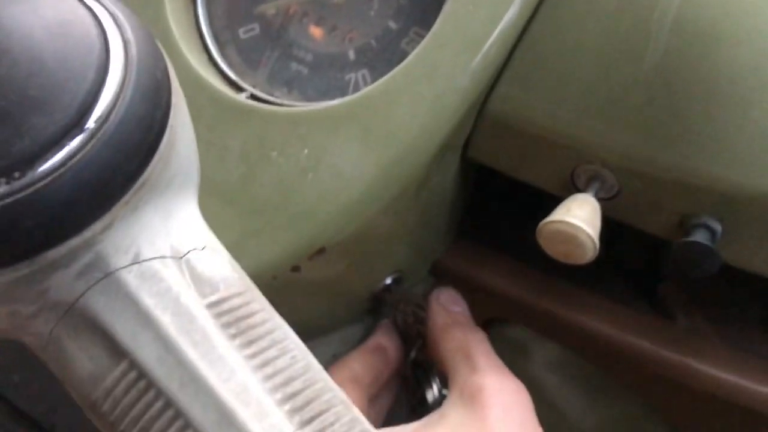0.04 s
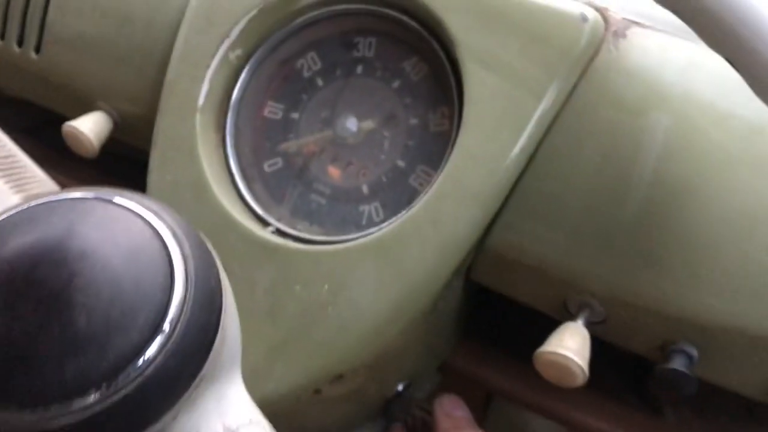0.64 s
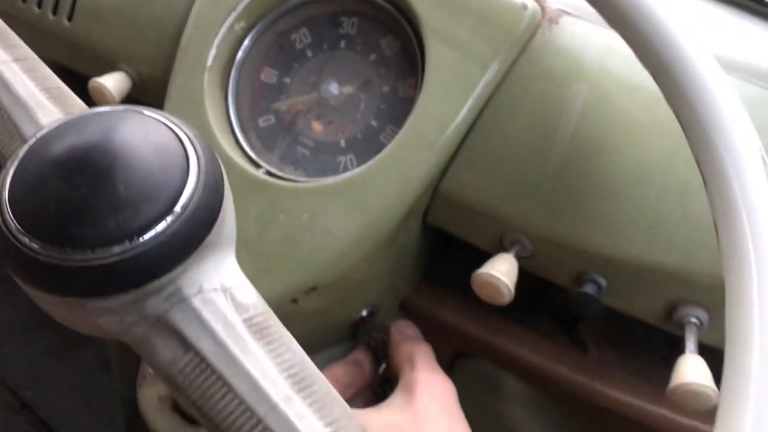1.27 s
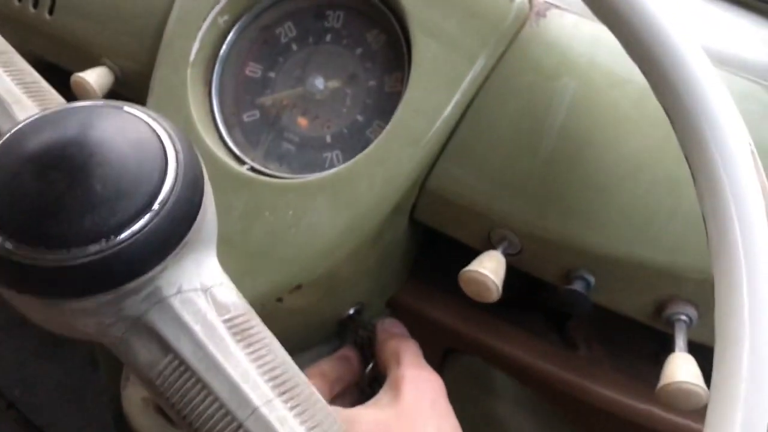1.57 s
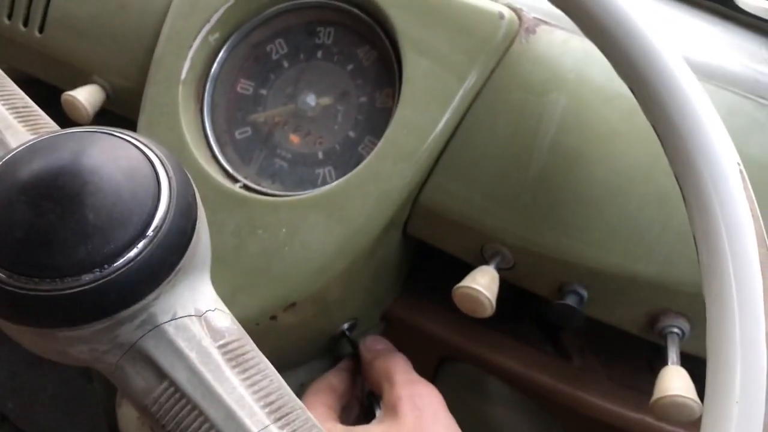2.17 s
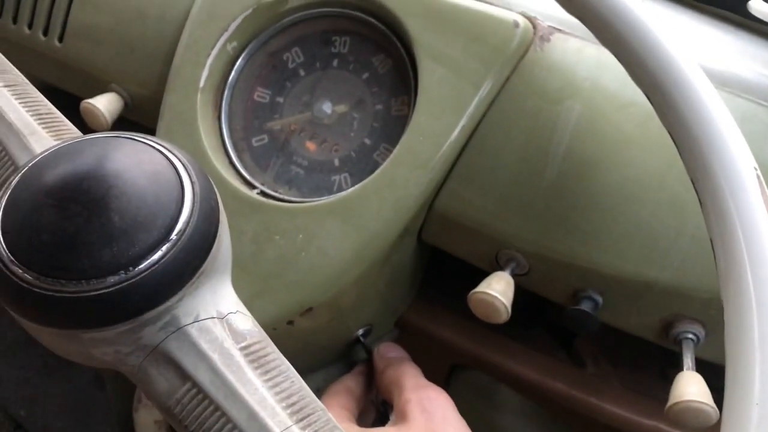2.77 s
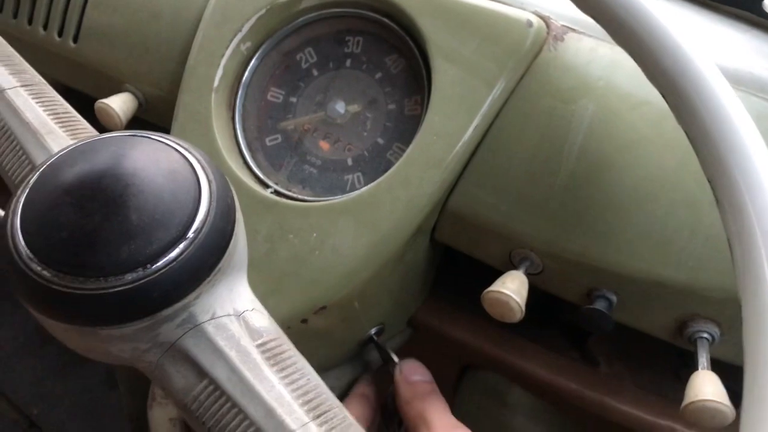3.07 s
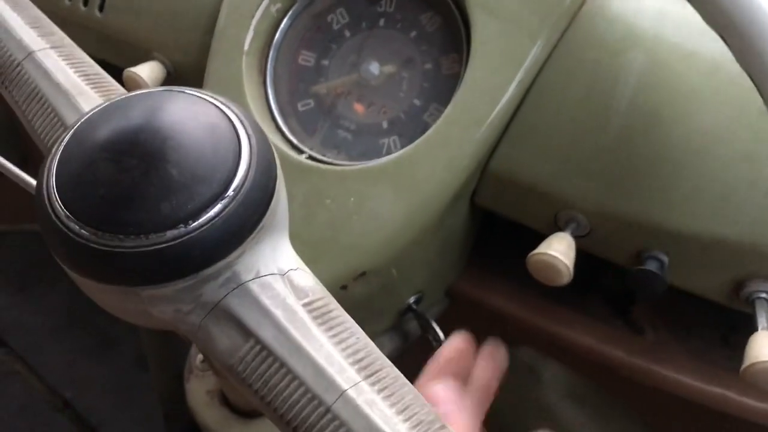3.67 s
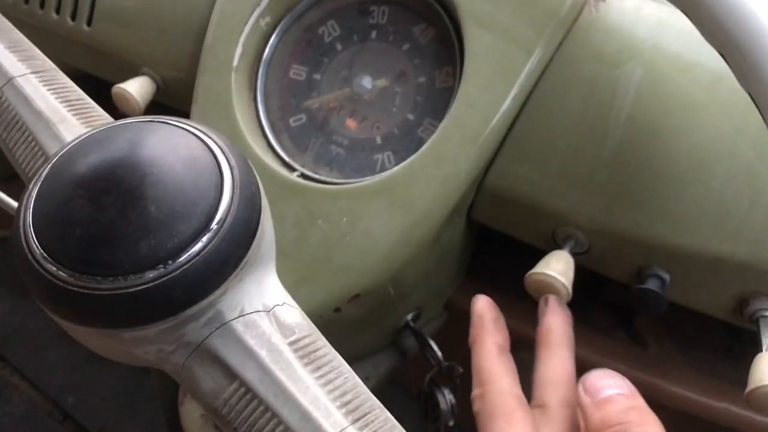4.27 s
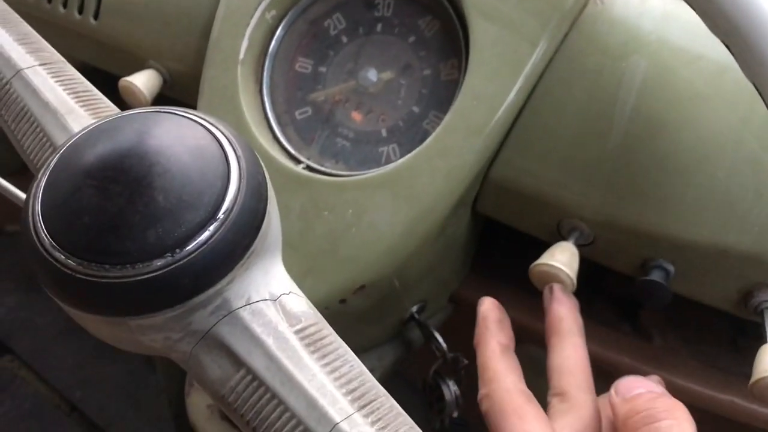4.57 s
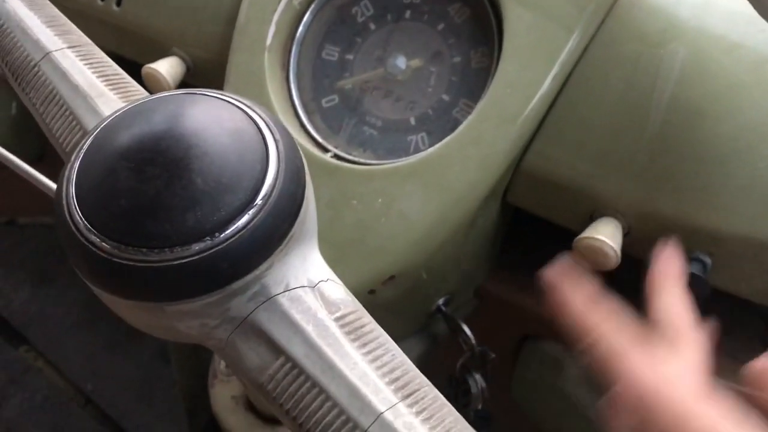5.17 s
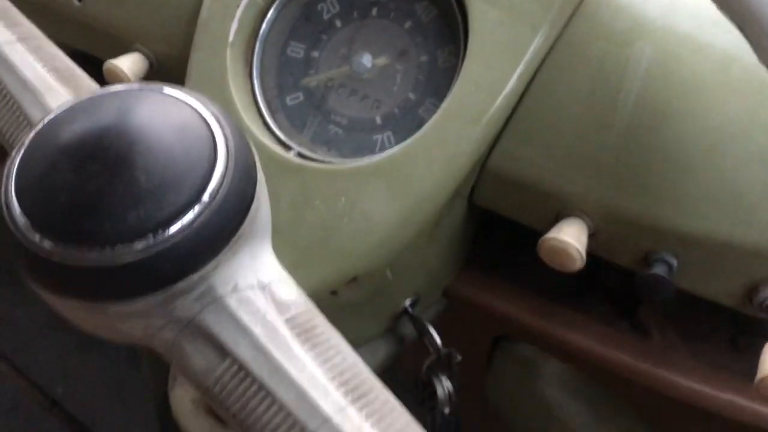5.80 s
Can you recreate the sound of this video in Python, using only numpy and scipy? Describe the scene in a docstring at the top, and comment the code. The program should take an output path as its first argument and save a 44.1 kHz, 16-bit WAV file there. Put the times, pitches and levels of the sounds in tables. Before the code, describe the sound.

Heard inside a metal cab, an air-cooled engine throbs, is switched off and runs down, followed by two sharp, ringing knob clicks.

```python
"""An old air-cooled flat-four idles behind the bare metal cab of a van, heard from the driver's seat.
Its exhaust pulses drive the air modes of the cab while panels drum, valves tap and the fan rushes.
The key clicks off, the key ring jingles, and the engine coasts and shudders to a stop against friction.
Over a faint outdoor rumble, a hand brushes and bumps the dashboard, a knob is pushed home through
two loud detents that set the sheet metal ringing, and something creaks by stick-slip friction."""
import sys
import numpy as np
from scipy import signal
from scipy.fft import rfft, irfft
from scipy.io import wavfile
from scipy.ndimage import uniform_filter1d

SR = 44100
rng = np.random.default_rng(int(sys.argv[2]) if len(sys.argv) > 2 else 0)


def pcm_store(signal):
    """Save signal as 16-bit PCM."""
    levels = np.round(np.clip(np.atleast_2d(signal), -1, 1) * 32767)
    wavfile.write(sys.argv[1], SR, levels.astype(np.int16).T)


N = 261954
T = np.arange(N) / SR
RING_T = T[:SR]  # time since a blow [s]
FIRST_FIRING_S, LAST_FIRING_S = .0595, 1.75
COAST_S, STOP_S = 1.695, 2.825
FIRING = T < LAST_FIRING_S


def amp(db):
    """Amplitude ratio of a level in decibels."""
    return 10 ** (np.asarray(db) / 20)


def unit_rms(x, span=slice(None)):
    """Normalisation to rms 1 over a span."""
    return x / np.sqrt(np.mean(x[span] ** 2) + 1e-20)


def bell(x, centre, width):
    """Gaussian of height 1, falling to 1/e at centre +- width."""
    return np.exp(-((x - centre) / width) ** 2)


def gain_at(points, hz):
    """Amplitude response of a spectrum in decibels."""
    return amp(log_interp(points, hz))


def log_interp(points, hz):
    """Interpolation on a log-frequency axis."""
    frequencies, values = np.transpose(points)
    return np.interp(np.log(hz + 1), np.log(frequencies), values)


def add(mix, start_s, sound):
    """Superposition of a sound on the mix."""
    part = mix[max(round(start_s * SR), 0):][:len(sound)]
    part += sound[:len(part)]


def coloured(x, spectrum, size=8192):
    """Minimum-phase filtering by a spectrum."""
    log_gain = np.log(gain_at(spectrum, abs(np.fft.fftfreq(size, 1 / SR))))
    response = np.exp(np.conj(signal.hilbert(log_gain)))
    taps = np.fft.ifft(response).real[:size // 2]
    return signal.oaconvolve(x, taps)[:len(x)]


def tilted(x, treble_db, bass_db):
    """Spectral tilt: a harder blow is brighter, a heavier one deeper."""
    return coloured(x, [(170, bass_db), (600, 0.016), (1900, 0.0017), (4000, treble_db)])


def resonate(x, hz, width_hz):
    """Second-order resonance with a peak gain of 1."""
    return signal.lfilter(*signal.iirpeak(hz, hz / width_hz, SR), x)


def forced_modes(drive, table):
    """Forced vibration: parallel resonances respond to one drive."""
    return sum(amp(db) * resonate(drive, hz, width) for hz, width, db in table)


def struck_modes(table, scatter_db, detune):
    """Free vibration: damped partials, weighted anew by where the blow lands; rms 1 at the start."""
    out = np.zeros(SR)
    for (hz, db, t60), (gain, shift, side) in zip(table, rng.standard_normal((len(table), 3))):
        envelope = amp(db + scatter_db * gain - 60 * RING_T / t60)
        out += np.sign(side) * envelope * np.sin(2 * np.pi * hz * (1 + detune * shift) * RING_T)
    return unit_rms(out, slice(SR // 50))


# damping of struck things in the cab: (frequency [Hz], t60 before scaling [s])
RING_TIMES = [(60, .9), (140, 0.69), (300, .35), (500, 0.13), (1000, .15), (1800, 0.12), (4000, 0.13),
              (8000, 0.11), (15000, 0.071)]
def ring(spectrum, t60_scale=1., rise_s=0.00017):
    """High modal density: ringing as noise, each band decaying at its own rate; rms 1 at the start."""
    hz, t, bands = signal.stft(rng.choice([-1., 1.], SR), SR, nperseg=256)
    t60 = t60_scale * log_interp(RING_TIMES, hz)[:, None]
    tail = signal.istft(bands * amp(-60 * t / t60), SR, nperseg=256)[1][:SR]
    attack = 1 - np.exp(-RING_T / rise_s)
    return unit_rms(coloured(tail * attack, spectrum), slice(SR // 50))


def speed_share(t=T):
    """Constant friction: without spark, the crank slows linearly from idle (1) to rest (0)."""
    return np.interp(t, [COAST_S, STOP_S], [1, 0])


# the idle lifts a little and settles: (time [s], speed [cycles/s])
IDLE_SPEED = [(.3, 8.08), (.75, 8.25), (1.05, 8.08)]
def speed(t=T):
    """Crank speed in four-stroke cycles per second."""
    return np.interp(t, *np.transpose(IDLE_SPEED)) * speed_share(t)


def crank_times(phase):
    """Phase is the integral of speed: the moments at which the crank passes a point in its cycle."""
    step = 32  # samples
    t = T[::step]
    cycles = np.cumsum(speed(t)) * step / SR
    cycles -= np.interp(FIRST_FIRING_S, t, cycles)
    marks = np.arange(-1, cycles[-1]) + phase
    return np.interp(marks[(marks > cycles[0]) & (marks < cycles[-1])], cycles, t)


def strokes(table, scatter_db):
    """Impulse train locked to the crank, with random scatter in level."""
    blows = np.zeros(N)
    for phase, db in table:
        times = crank_times(phase)
        blows[(times * SR).astype(int)] += amp(db + scatter_db * rng.standard_normal(len(times)))
    return blows


def puffed(blows, width_s):
    """Convolution turns each impulse into a smooth pressure swing, a Gaussian's second derivative."""
    u = np.linspace(-8, 8, 2 * round(8 * width_s * SR) + 1)
    return signal.oaconvolve(blows, (u ** 2 - 1) * np.exp(-u ** 2 / 2), "same")


def bursts(blows, decay_s):
    """Leaky integration: an envelope that jumps at each impulse and decays; rms 1 at idle."""
    return unit_rms(signal.lfilter([1], [1, -np.exp(-1 / (decay_s * SR))], blows), FIRING)


def running_gain(power, lag_s):
    """Power law: a gain that follows crank speed through a first-order lag."""
    pole = np.exp(-1 / (lag_s * SR))
    return 1 - signal.lfilter([1 - pole], [1, -pole], 1 - speed_share() ** power)


# air modes of the cab: (frequency [Hz], bandwidth [Hz], gain [dB])
CAB_MODES = [(40.3, 42, -3), (78.76, 1.5, 9.5), (98.7, 40, -7), (141.3, 7.6, 15.5), (160, 44, -11)]
# cylinder firings: (phase [cycles], relative puff level [dB], puff width [s], relative thud level [dB])
CYLINDERS = [(0, -20, .0034, -0.5), (0.331, -27.5, 0.0032, -3), (0.591, -20, 0.0045, -8),
             (0.767, -44.5, 0.0018, -6.5)]
def exhaust():
    """Cavity resonance: four uneven cylinders puff into the booming cab until the firing ends."""
    puffs = sum(puffed(strokes([(phase, db)], scatter_db=1.0) * FIRING, width_s)
                for phase, db, width_s, _ in CYLINDERS)
    return amp(0.5) * (puffs + forced_modes(puffs, CAB_MODES))


# drumming body panels: (frequency [Hz], relative level [dB])
PANEL_SPECTRUM = [(60, -27), (120, 14), (160, 6.5), (225, -1.5), (280, 0), (338, 5), (375, -4), (410, -2.5),
                  (480, -34.5), (800, -61)]
def panel_drumming(level_db=-39, firing_boost_db=3.5):
    """Structure-borne sound: cylinder thuds, part periodic and part turbulent, drive the panels."""
    thuds = strokes([(phase, db) for phase, _, _, db in CYLINDERS], scatter_db=1.5)
    turbulence = rng.standard_normal(N) * (.5 + bursts(thuds, decay_s=.03))
    drive = .55 * unit_rms(thuds, FIRING) + .6 * turbulence
    panels = unit_rms(coloured(drive, PANEL_SPECTRUM), FIRING)
    return amp(level_db + firing_boost_db * FIRING) * panels * running_gain(power=1.0, lag_s=0.31)


# valve gear taps: (phase [cycles], relative level [dB])
VALVE_TAPS = [(.02, 0), (.19, -3), (.43, -1), (.55, 0), (.70, 0), (.76, -1), (.92, -3)]
# mechanical clatter: (frequency [Hz], relative level [dB])
CLATTER_SPECTRUM = [(300, -12), (500, -9.5), (600, -11), (730, -5.5), (930, -6.5), (1060, -13),
                    (1190, -4.5), (1320, -16), (1580, -2.5), (1850, -14.5), (2100, -16.5), (2450, -28),
                    (3300, -34.5), (6000, -64)]
# tinware around the engine: (frequency [Hz], bandwidth [Hz], gain [dB])
TIN_MODES = [(741, 14, -5.5), (1470, 61, 6), (1630, 26, -13), (1629, 33, 3.5), (1890, 29, 4), (2104, 15, 8)]
def valve_clatter(level_db=-41.5, loose_per_s=60):
    """Impact noise: regular valve taps and random loose parts, over gear noise, excite the tinware."""
    loose = rng.random(N) * (rng.random(N) < loose_per_s / SR)
    taps = bursts(strokes(VALVE_TAPS, scatter_db=2) + loose, decay_s=.006)
    envelope = np.hypot(1.25, taps)  # steady noise and taps add in power
    gear = coloured(rng.standard_normal(N) * envelope, CLATTER_SPECTRUM)
    clatter = unit_rms(gear + forced_modes(gear, TIN_MODES), FIRING)
    return amp(level_db) * clatter * running_gain(power=1.19, lag_s=0.12)


# rush of cooling air: (frequency [Hz], relative level [dB])
FAN_SPECTRUM = [(800, -26), (2500, 5.5), (3400, -1), (4300, 4), (5300, -4.5), (6400, -0.5), (8000, -10),
                (10000, -20), (12000, -37)]
def fan(level_db=-60.5):
    """Amplitude modulation: the fan's broadband noise surges once a cycle."""
    surge = bursts(strokes([(.4, 0)], scatter_db=1.5), decay_s=.045)
    air = unit_rms(coloured(rng.standard_normal(N) * (4.5 + surge), FAN_SPECTRUM), FIRING)
    return amp(level_db) * air * running_gain(power=1.63, lag_s=0.036)


# outdoor rumble and faint hiss: (frequency [Hz], relative level [dB])
BACKGROUND_SPECTRUM = [(25, -13.5), (59, 2), (102, -19), (150, -14.5), (200, -23.5), (310, -18.5),
                       (520, -30), (1000, -27.5), (1300, -32), (1620, -25), (2200, -38), (8000, -37.5),
                       (9200, -44.5), (16000, -46)]
def background(level_db=-57.5, tick_db=-79, tick_period_s=.05):
    """Masking: rumble, hiss and a very faint regular treble ticking lie hidden until the engine stops."""
    since_tick = (T - .005) % tick_period_s
    ticks = rng.standard_normal(N) * np.exp(-since_tick / 0.0014)
    ticks = coloured(ticks, [(1000, -18.5), (3000, 6.5), (8000, 4), (10000, -8.5)])
    rumble = coloured(rng.standard_normal(N), BACKGROUND_SPECTRUM)
    return amp(level_db) * unit_rms(rumble) + amp(tick_db) * unit_rms(ticks)


# metal striking metal: (frequency [Hz], gain [dB])
CRACK_SPECTRUM = [(800, -11.5), (6500, 2), (11000, -20.5), (15000, -23)]
def crack():
    """Contact transient: a brief impact gives a few milliseconds of bright noise."""
    return coloured(rng.standard_normal(SR) * np.exp(-RING_T / .004), CRACK_SPECTRUM)


# sheet-metal dashboard: (frequency [Hz], relative level [dB], t60 [s])
DASH_MODES = [(129, -13.5, .72), (150, -16.5, .6), (306.4, -4.5, 0.21), (379, -14, 0.21), (685.5, -4, 0.12),
              (846, -19, .12), (997, -16.5, 0.1), (1194, -2, 0.085), (1252, -7, 0.08), (1485, -2.5, 0.14),
              (1536, 1.5, 0.11), (1731, 4, 0.08), (1850, -9, 0.098), (2260, -14.5, 0.069),
              (3330, -18.5, .1), (3620, -17.5, .09), (4130, -8.5, 0.11), (4400, -10, .08),
              (5152, -13.5, .07), (5750, -8, 0.1), (6420, -1.5, .08), (6610, -9.5, .08), (7060, -8.5, .07),
              (7190, -13.5, .09), (7850, -14, .09)]
def dashboard(scatter_db, detune):
    """Plate vibration: struck sheet metal rings in inharmonic modes."""
    return struck_modes(DASH_MODES, scatter_db, detune)


# ringing lock: (frequency [Hz], relative level [dB])
LOCK_SPECTRUM = [(100, -9.5), (260, -5.5), (400, 4), (540, -13), (800, 5), (980, 0), (1150, 5), (1350, -8),
                 (1700, 5.5), (2700, -20.5), (4200, -11.5), (5000, -21), (6000, -18), (8500, -24.5),
                 (11000, -36), (15500, -41)]
# the lock snapping off: (time [s], level [dB], treble gain [dB], bass gain [dB])
LOCK_SNAPS = [(1.6472, -26, 14, -21), (1.6517, -20, -5.5, -3.5), (1.657, -42, -14, 9.5)]
def ignition_lock():
    """Impulse excitation: the lock snaps round, ringing itself and the dashboard that holds it."""
    out = np.zeros(N)
    for s, db, treble_db, bass_db in LOCK_SNAPS:
        dash = tilted(dashboard(scatter_db=3, detune=.003), treble_db=-12, bass_db=2.5)
        lock = ring(LOCK_SPECTRUM, t60_scale=0.77, rise_s=0.00069)
        snap = 0.98 * lock + 0.15 * dash + 0.12 * crack()
        add(out, s, amp(db) * tilted(snap, treble_db, bass_db))
    return out


# clear partials of the keys: (frequency [Hz], relative level [dB], t60 [s])
KEY_MODES = [(4000, -7, 0.068), (5841, -7, .06), (6740, -4, 0.043), (7300, -1, .11), (8000, -7, .05),
             (8780, -6.5, 0.1), (9700, -12, 0.096), (13550, -12, .1)]
# dense ringing of the bunch: (frequency [Hz], relative level [dB])
KEY_SPECTRUM = [(300, -0.5), (1500, 0.5), (2800, -11), (4200, 0), (5200, -6), (7300, -8), (9000, -18),
                (11000, -22), (13700, -12.5), (16000, -30)]
# keys touching: (time [s], level [dB], treble gain [dB])
KEY_CONTACTS = [(1.7462, -52.5, 0.5), (1.7734, -43, 0.5), (3.0777, -58, -7), (3.151, -55, -20),
                (3.1693, -54.5, -7), (3.248, -52.5, -1.5), (3.3465, -58.5, -9), (3.434, -59.5, -5.5)]
def key_ring():
    """Free vibration: swinging keys collide and ring in high, short-lived modes."""
    out = np.zeros(N)
    for s, db, treble_db in KEY_CONTACTS:
        jingle = struck_modes(KEY_MODES, scatter_db=3, detune=.006)
        clink = .85 * ring(KEY_SPECTRUM, t60_scale=.8, rise_s=.0006) + .75 * jingle
        add(out, s, amp(db) * tilted(clink, treble_db, bass_db=0))
    return out


# the engine on its rubber mounts: (frequency [Hz], bandwidth [Hz], gain [dB])
MOUNT_MODES = [(39.1, 7, 4.5), (53.7, 8.1, 2), (82.2, 17, 6), (137, 25, 5)]
def coasting(level_db=-21.5, dip_db=-14.5):
    """Mass-spring resonance: unfired, all four cylinders pump alike and rock the engine on its mounts."""
    blows = strokes([(.04 + k / 4, 0) for k in range(4)], scatter_db=1.2)
    dip = bell(T, centre=2.12, width=0.031)  # the throb dips briefly
    pumping = bell(speed(), centre=5.7, width=3.0)  # strongest at one crank speed
    strength = amp(level_db + dip_db * dip) * pumping * (T > LAST_FIRING_S)
    puffs = puffed(blows * strength, width_s=0.0043)
    return .25 * puffs + forced_modes(puffs, MOUNT_MODES)


# rattling engine and tinware: (frequency [Hz], relative level [dB])
RATTLE_SPECTRUM = [(200, 3), (500, -5.5), (800, -6), (1200, -0.5), (1620, 6), (2000, -10), (2600, -26),
                   (4300, -26), (7000, -37.5), (11000, -48)]
# stray knocks: (time [s], level [dB])
TIN_KNOCKS = [(2.056, -37.5), (2.905, -58), (2.96, -60)]
def tin_knocks():
    """Impact excitation: loose tinware knocks and rings in many overlapping modes."""
    out = np.zeros(N)
    for s, db in TIN_KNOCKS:
        add(out, s, amp(db) * ring(RATTLE_SPECTRUM, rise_s=.0012))
    return out


def shudder(level_db=-38, peak_speed=3.0, speed_width=1.7):
    """Forced rocking: each last compression rattles the engine, with a softer attack as it slows."""
    out = np.zeros(N)
    compressions = np.concatenate([crank_times(.034 + k / 4) for k in range(4)])
    for s in compressions[speed(compressions) < peak_speed + speed_width]:
        rise_s = .0016 * (peak_speed / speed(s)) ** 1.6
        rattle = ring(RATTLE_SPECTRUM, t60_scale=1.24, rise_s=rise_s)
        add(out, s, amp(level_db) * bell(speed(s), peak_speed, speed_width) * rattle)
    return out


# low tones of the cab: (start time [s], frequency [Hz], peak level [dB], swell time [s])
CAB_HUMS = [(2.4, 72.4, -48.5, .2), (2.725, 58.7, -41, 0.079)]
def cab_hum():
    """Resonant build-up and decay: the cab hums on for a moment as the crank stops."""
    out = np.zeros(N)
    for s, hz, db, swell_s in CAB_HUMS:
        envelope = T / swell_s * np.exp(1 - T / swell_s)
        add(out, s, amp(db) * envelope * np.sin(2 * np.pi * hz * T))
    return out


# strokes over key and dashboard: (start time [s], duration [s], level [dB], centre frequency [Hz])
HAND_STROKES = [(2.8, 0.73, -72, 1170), (3.933, 0.058, -71, 1376), (3.976, 0.071, -67, 620),
                (4.077, .22, -68, 574), (5.421, 0.26, -70, 1550)]
def hand_rustle(grain=0.76, width_hz=560):
    """Sliding friction: skin on paint gives a soft, grainy swell of noise for each stroke."""
    out = np.zeros(N)
    for s, duration_s, db, hz in HAND_STROKES:
        slip, grip = rng.standard_normal((2, SR))
        roughness = np.exp(grain * unit_rms(uniform_filter1d(grip, size=400)))
        rub = resonate(slip * roughness, hz, width_hz)
        rub = unit_rms(resonate(rub, hz, 2 * width_hz))
        swell = np.sin(np.pi * np.minimum(RING_T / duration_s, 1))
        add(out, s, amp(db) * rub * swell)
    return out


# dull thud: (frequency [Hz], relative level [dB])
BUMP_SPECTRUM = [(30, -6.5), (65, -0.5), (130, -12.5), (220, -13), (300, -11.5), (420, -19.5), (700, -23.5),
                 (2000, -23), (6000, -53)]
# bumps of hand and body: (time [s], level [dB], bass gain [dB])
BUMPS = [(2.895, -43, 3), (3.254, -47, -9.5), (3.4, -42, -5), (3.454, -42, -6.5), (3.699, -53, 9.5)]
def soft_bumps(hollow_hz=282.0, decay_s=0.0083):
    """Heavy damping: the driver's soft contacts give dull, hollow knocks that die at once."""
    out = np.zeros(N)
    hollow = np.sin(2 * np.pi * hollow_hz * RING_T) * np.exp(-RING_T / decay_s)
    for s, db, bass_db in BUMPS:
        thud = 0.45 * ring(BUMP_SPECTRUM, t60_scale=0.13, rise_s=0.0041)
        add(out, s, amp(db) * tilted(thud + hollow, 0, bass_db))
    return out


# dense ringing of a detent: (frequency [Hz], relative level [dB])
KNOB_SPECTRUM = [(60, -15.5), (170, -12.5), (300, -7), (400, -5.5), (510, -23), (680, -4), (830, -12.5),
                 (1200, -9.5), (1700, -1.5), (2600, -17.5), (3600, -16.5), (4300, -6.5), (5100, -12.5),
                 (6400, -8.5), (8000, -14), (10300, -35), (15500, -41.5)]
# faint tinny after-ring: (frequency [Hz], relative level [dB])
AFTERRING_SPECTRUM = [(400, -31), (1000, -3.5), (1650, 0), (2400, -23), (6000, -44)]
# detents and small slips: (time [s], level [dB], treble gain [dB], bass gain [dB], boom gain [dB])
KNOB_CLICKS = [(4.8075, -31.5, -12.5, -1.5, -42.5), (4.8170, -16.5, -9.5, 1, -32),
               (5.1027, -53, -1, -5, -39), (5.1115, -32, -22, -11.5, -41.5),
               (5.1250, -11.5, 1.5, -5.5, -22.5), (5.2263, -48, -3, 16, -12)]
def knob(boom_hz=68.6, afterring_db=-37):
    """Structural-acoustic coupling: each detent cracks, rings the dashboard and makes the cab air boom."""
    out = np.zeros(N)
    boom = np.sin(2 * np.pi * boom_hz * RING_T) * np.exp(-RING_T / .15)
    for s, db, treble_db, bass_db, boom_db in KNOB_CLICKS:
        wash = ring(KNOB_SPECTRUM, rise_s=.0004)
        blow = .62 * wash + .74 * dashboard(scatter_db=1.5, detune=.002) + 1.3 * crack()
        afterring = amp(afterring_db) * ring(AFTERRING_SPECTRUM, t60_scale=4.3)
        add(out, s, amp(db) * (tilted(blow, treble_db, bass_db) + afterring + amp(boom_db) * boom))
    return out


# spring of the knob: (frequency [Hz], level [dB], t60 [s])
SPRING_MODES = [(4102, -23, 0.15), (4440, -19.5, .1), (4445, -21, 0.15), (4290, -62, .65),
                (4350, -62.5, 0.82), (6200, -22.5, 0.088), (6860, -23.5, 0.087)]
def knob_spring(home_s=5.125):
    """Damped oscillation: the spring sings as the knob hits home."""
    out = np.zeros(N)
    for hz, db, t60 in SPRING_MODES:
        add(out, home_s, amp(db - 60 * RING_T / t60) * np.sin(2 * np.pi * hz * RING_T))
    return out


# ringing of one slip: (frequency [Hz], relative level [dB])
CREAK_SPECTRUM = [(400, -37), (800, -13), (1050, 2), (1550, 3), (1850, -9), (2300, -28), (4500, -22),
                  (9000, -40.5)]
# slips of the creak: (time [s], level [dB])
CREAK_SLIPS = [(5.879, -61), (5.895, -52), (5.901, -52), (5.917, -57.5), (5.926, -57.5)]
def creak():
    """Stick-slip friction: a quick run of slips, each ringing briefly."""
    out = np.zeros(N)
    for s, db in CREAK_SLIPS:
        add(out, s, amp(db) * ring(CREAK_SPECTRUM, t60_scale=0.52))
    return out


def scene():
    """Superposition: all sources in the cab sum to one channel."""
    idling = exhaust() + panel_drumming() + valve_clatter() + fan() + background()
    stopping = ignition_lock() + key_ring() + coasting() + tin_knocks() + shudder() + cab_hum()
    handling = hand_rustle() + soft_bumps() + knob() + knob_spring() + creak()
    return (idling + stopping + handling)[None]


def record(dry, overload=.95, cutoff_hz=15900):
    """Transducer limits: the microphone sheds deep bass, clips the loudest peaks and limits the band."""
    hz = np.fft.rfftfreq(N, 1 / SR)
    bass_rolloff = gain_at([(15, -18.5), (24, -4.5), (32, -5.5), (42, 0)], hz)
    thinned = irfft(rfft(dry) * bass_rolloff, N)
    clipped = np.clip(thinned, -overload, overload)
    lowpass = signal.firwin(511, cutoff_hz, window=("kaiser", 9), fs=SR)
    return signal.oaconvolve(clipped, lowpass[None], "same")


dry = scene()
out = record(dry)
pcm_store(out)
```